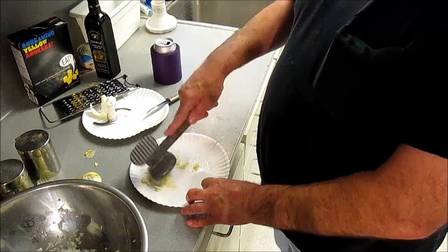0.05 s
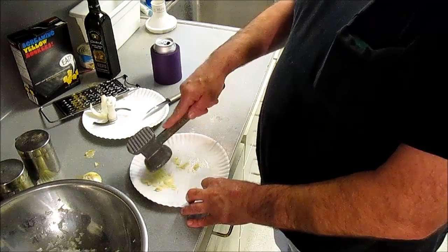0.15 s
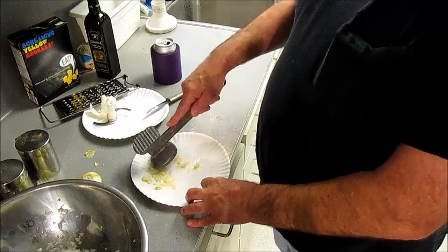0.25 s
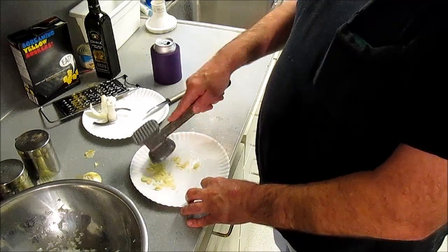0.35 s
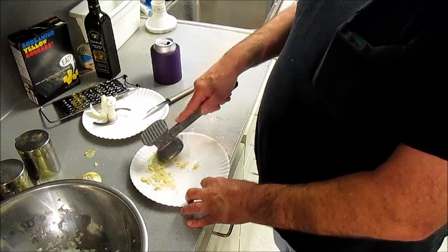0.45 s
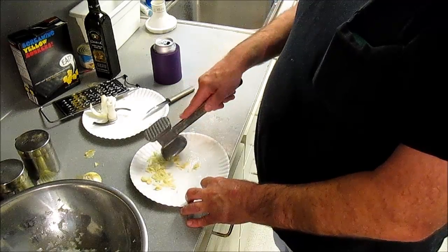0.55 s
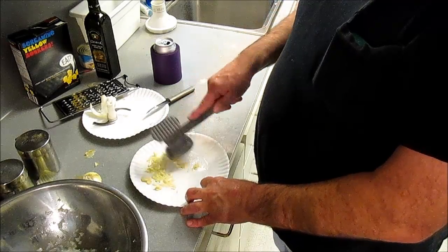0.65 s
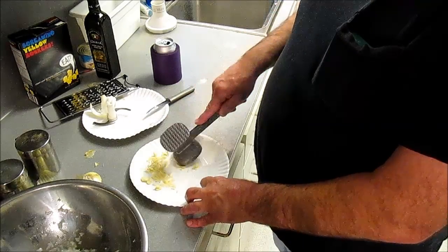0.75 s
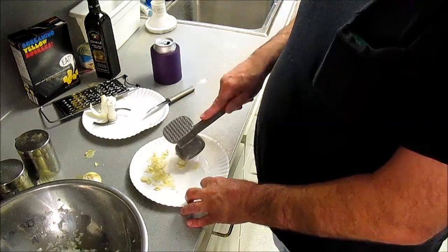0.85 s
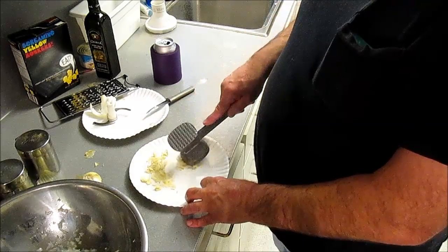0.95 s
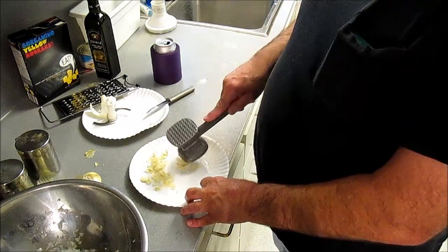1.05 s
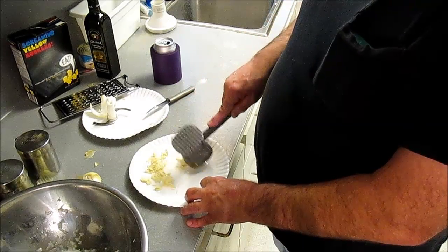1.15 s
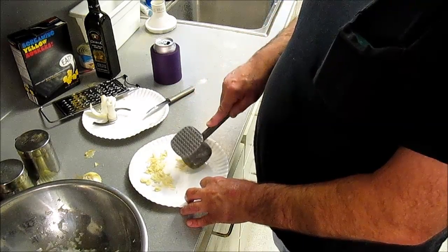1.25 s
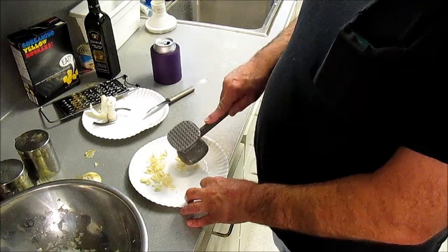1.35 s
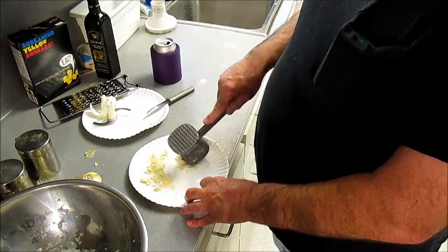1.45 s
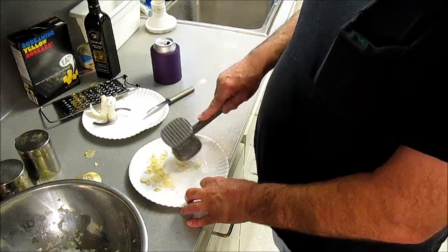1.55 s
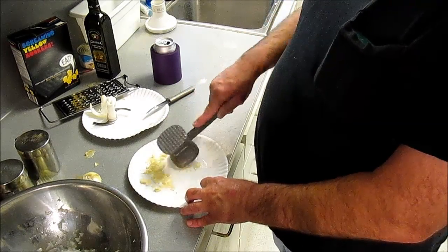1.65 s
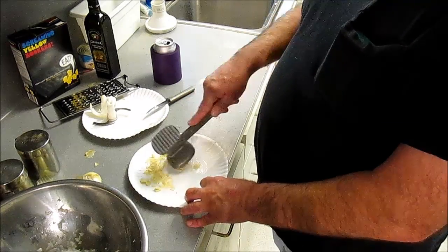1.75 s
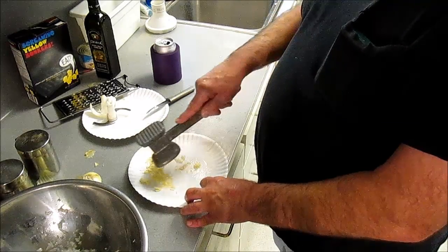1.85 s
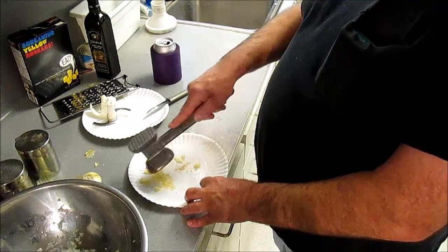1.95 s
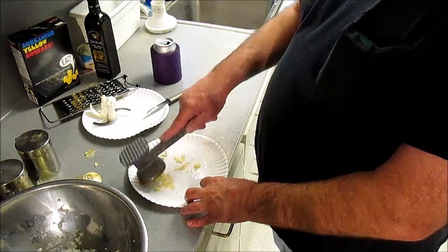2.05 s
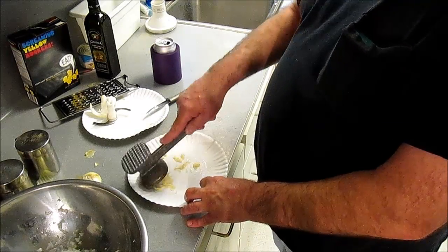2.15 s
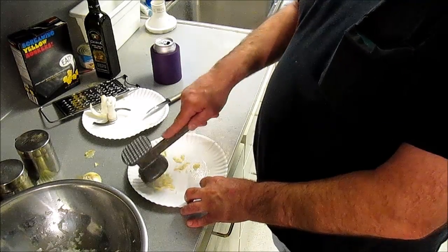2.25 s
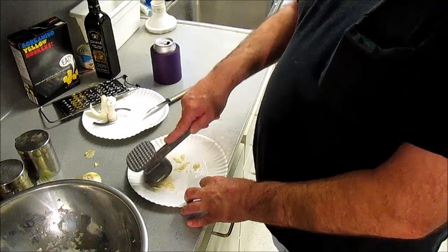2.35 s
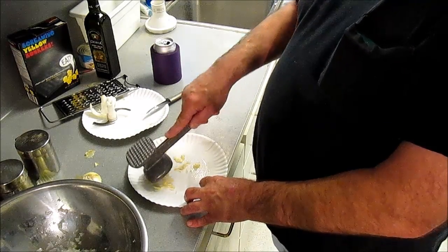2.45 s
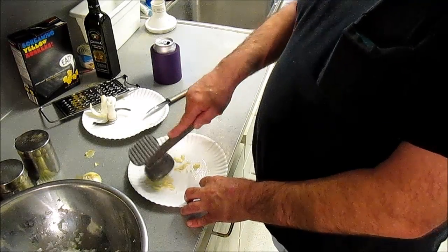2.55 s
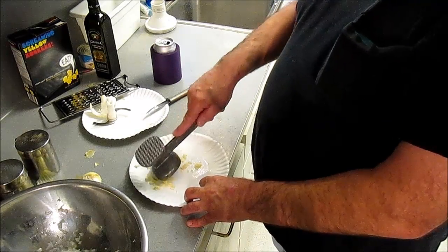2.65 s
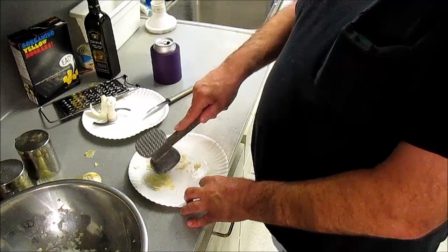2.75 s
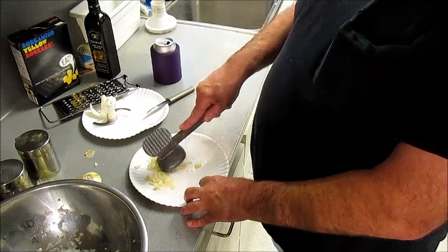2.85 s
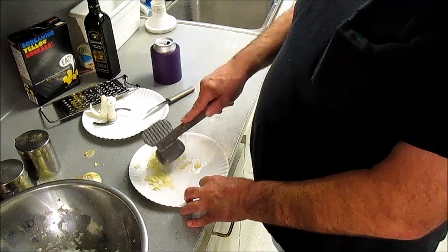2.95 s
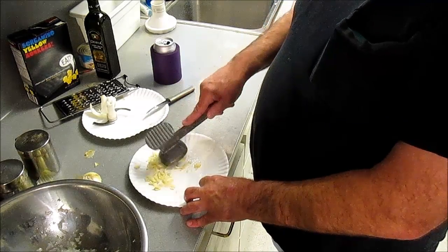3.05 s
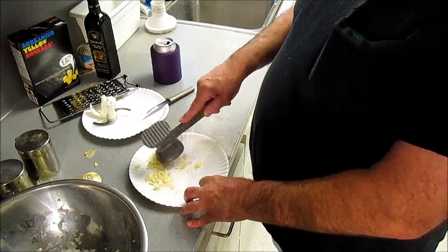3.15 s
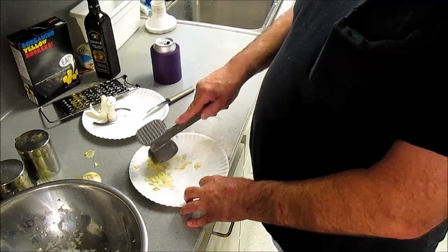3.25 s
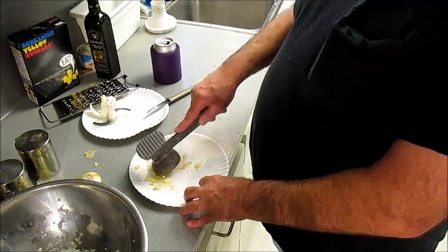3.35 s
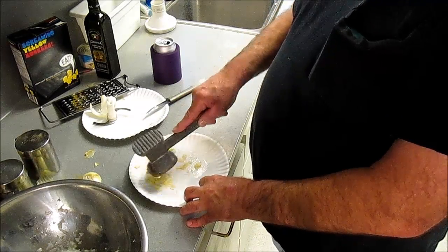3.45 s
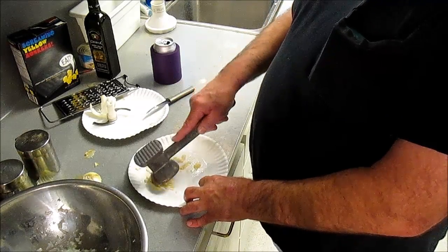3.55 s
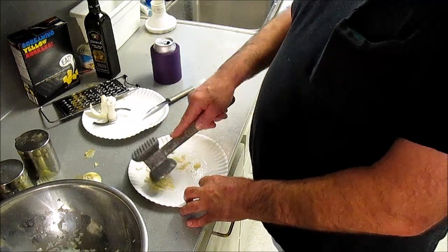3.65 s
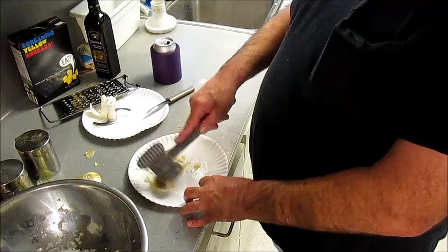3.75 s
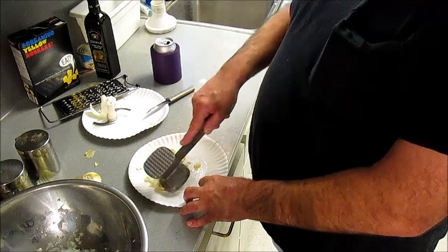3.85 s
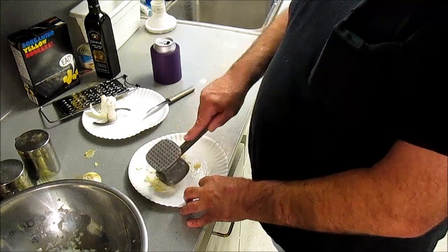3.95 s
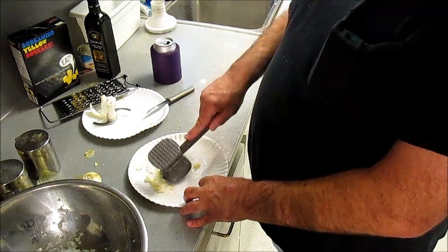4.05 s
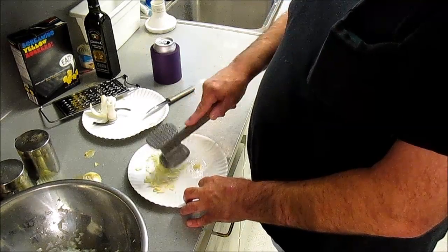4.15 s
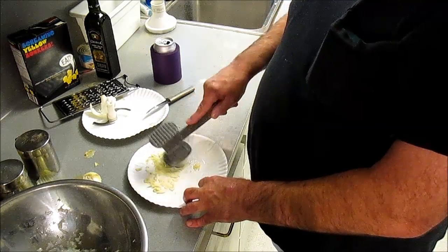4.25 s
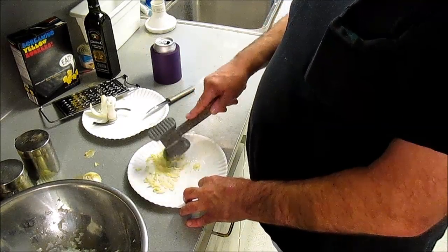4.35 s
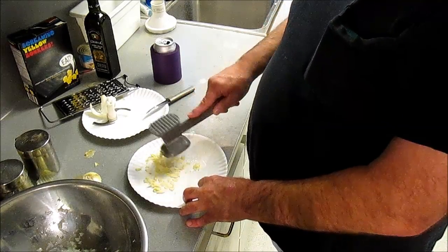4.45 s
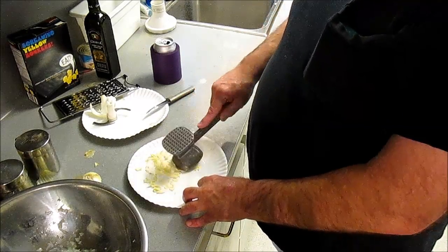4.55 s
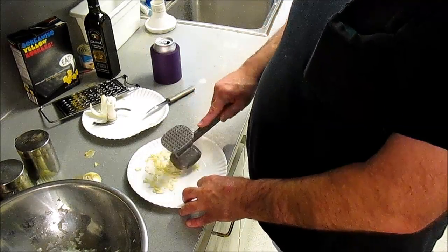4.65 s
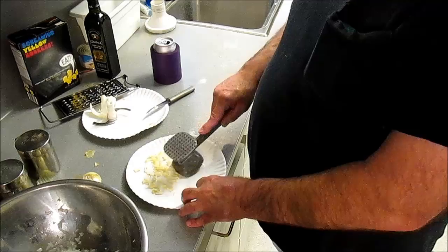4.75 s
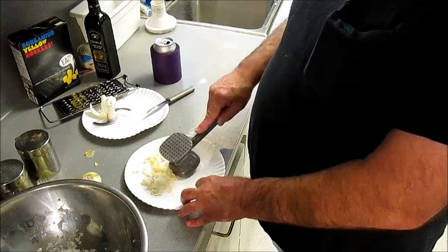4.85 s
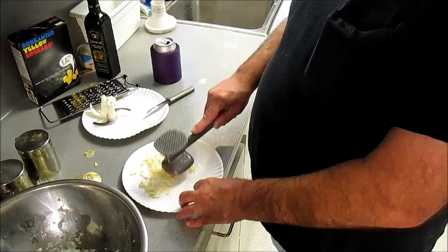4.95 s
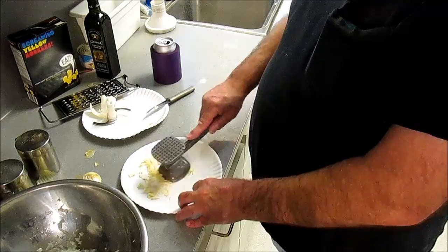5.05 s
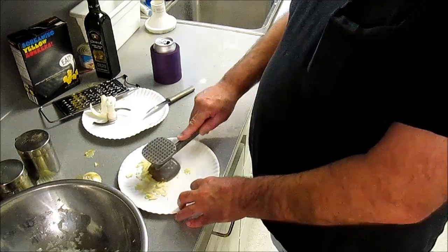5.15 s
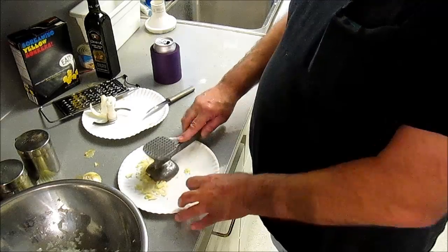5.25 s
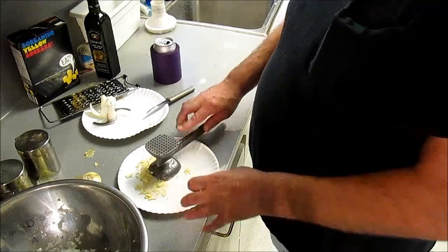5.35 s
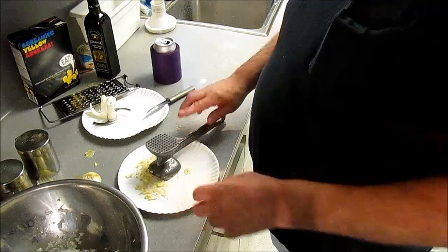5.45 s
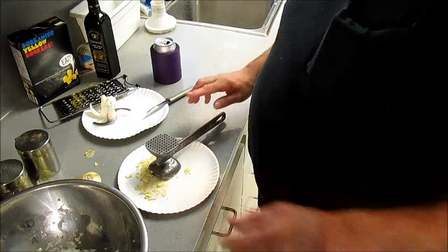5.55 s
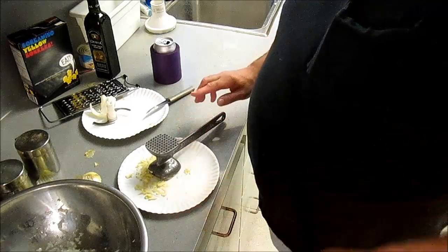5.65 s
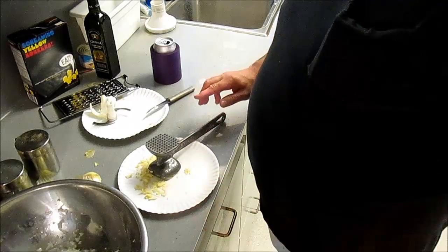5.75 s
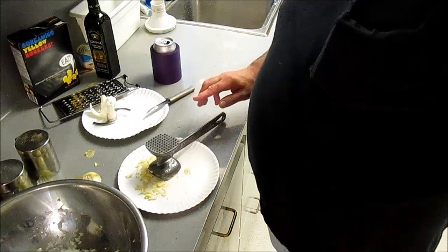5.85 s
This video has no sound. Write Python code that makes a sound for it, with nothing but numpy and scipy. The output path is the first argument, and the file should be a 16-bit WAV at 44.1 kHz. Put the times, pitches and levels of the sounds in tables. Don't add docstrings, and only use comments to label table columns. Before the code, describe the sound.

Close in a small hard-walled kitchen, a metal mallet pounds garlic on a paper plate about four times a second. Each blow is a hollow counter thump with papery clatter and a small wet crunch; nearby metal utensils jingle faintly. After five seconds it scuffs, clacks down and rings brightly until the handle lands. A low fridge drone sits underneath. Two close microphones.

```python
import sys
import numpy as np
from scipy import signal
from scipy.fft import rfft, irfft, next_fast_len
from scipy.io import wavfile
from scipy.ndimage import uniform_filter1d

SR = 44100
rng = np.random.default_rng(int(sys.argv[2]) if len(sys.argv) > 2 else 0)


def volts_from_decibels(level):
    exponent = np.asarray(level, float) / 20
    return 10 ** exponent


def file_out(sig):
    cols = np.atleast_2d(sig).T
    lim = np.clip(cols, -1, 1)
    pcm = np.round(lim * 32767).astype(np.int16)
    wavfile.write(sys.argv[1], SR, pcm)


N = 259772
LEAD = 4096
SIZE = next_fast_len(N + LEAD + SR // 2, real=True)
HZ = np.arange(SIZE // 2 + 1) * SR / SIZE
STEREO = np.array([[1], [-1]])


def read(table, hz, column=1):
    table = np.array(table, float)
    return np.interp(np.log(np.maximum(hz, 1)), np.log(table[:, 0]), table[:, column])


def colour(x, table):
    gain = volts_from_decibels(read(table, np.fft.rfftfreq(x.shape[-1], 1 / SR)))
    y = irfft(rfft(x) * gain, x.shape[-1])
    return y * np.std(x) / np.std(y)


def fade(t, t60):
    return (t >= 0) * np.exp(-np.log(1000) * np.maximum(t, 0) / t60)


def ring(modes, t):
    hz, db, t60 = np.array(modes, float)[:, :3].T[:, :, None]
    return volts_from_decibels(db) * fade(t, t60) * np.sin(2 * np.pi * hz * t)


def add(track, s, sound):
    i = LEAD + int(round(s * SR))
    track[..., i:i + sound.shape[-1]] += sound[..., :track.shape[-1] - i]


def pair(count):
    # (frequency [Hz], correlation [0..1])
    likeness = [(60, 0.99), (290, 0.89), (640, 0.82), (1400, 0.59), (3100, 0.042), (16000, 0.0088)]
    c = np.clip(read(likeness, np.fft.rfftfreq(count, 1 / SR)), 0, 1)
    mid, side = rfft(rng.standard_normal((2, count)))
    return (np.sqrt(1 + c) * mid + np.sqrt(1 - c) * side * STEREO) / np.sqrt(2)


def grit(count, spread_db):
    grains = np.repeat(rng.exponential(size=count // 32 + 1), 32)[:count]
    lumps = uniform_filter1d(grains, size=24)
    noise = 0.9 * rng.standard_normal(count) + rng.standard_normal((2, count))
    x = noise * volts_from_decibels(spread_db * np.minimum(lumps, 3))
    return x / np.std(x)


def background():
    # (frequency [Hz], density [dB per Hz])
    air_tone = [(25, -25), (40, 3), (60, 4.5), (150, 1.5), (300, 1), (600, -6), (1000, -10.5), (1700, -16),
                (2000, -21.5), (3000, -26.5), (6000, -26.5), (9000, -38.5), (13000, -44), (16400, -48)]
    # (time [s], level [dB])
    air_swell = [
        (0, -52.5),
        (2, -54),
        (5.3, -54),
        (5.6, -52.5),
        (5.75, -51),
        (5.89, -50.5),
    ]
    fridge_hz, fridge_width_hz, fridge_db = 115.1, 7.4, -56
    t = (np.arange(SIZE) - LEAD) / SR
    air = irfft(pair(SIZE) * volts_from_decibels(read(air_tone, HZ)), SIZE)
    air = air / np.std(air) * volts_from_decibels(np.interp(t, *np.transpose(air_swell)))
    hum_band = 1 / (1 + ((HZ - fridge_hz) / fridge_width_hz) ** 4)
    drone = irfft(rfft(rng.standard_normal(SIZE)) * hum_band, SIZE)
    return air + volts_from_decibels(fridge_db) * drone / np.std(drone)


def plate_clatter(t):
    # (frequency [Hz], level [dB])
    plate = [(150, -41), (250, -7), (500, 3), (900, 0), (1400, -5), (2200, -12.5), (3500, -14)]
    # (frequency [Hz], level [dB])
    knock = [(700, -15), (1100, 4.5), (1500, -5.5), (2000, 0), (2800, -14)]
    rattle = irfft(pair(len(t)))
    clatter = colour(rattle, plate) * fade(t, 0.13) * (1 - fade(t, 0.031))
    smack = colour(rattle.mean(axis=0), knock) * fade(t, 0.026) * (1 - fade(t, 0.0042))
    return clatter + volts_from_decibels(-1) * smack


def garlic_crunch(t, crunch_db):
    # (frequency [Hz], level [dB])
    crushing = [(900, -1.5), (1500, 2.5), (2200, -2), (3000, -3), (5000, -9.5), (7500, -14), (10000, -22.5),
                (13000, -21.5), (16000, -23)]
    burst = 0.29 * fade(t, 0.0077)
    burst = burst + 1.5 * fade(t - .0022, 0.0015)
    burst = burst + fade(t - .002, 0.015)
    burst = burst + volts_from_decibels(-6.5) * fade(t - .004, 0.21)
    return volts_from_decibels(crunch_db + 10.5) * colour(grit(len(t), spread_db=5.0), crushing) * burst


def utensils(out, t):
    # (frequency [Hz], level [dB])
    bowl = [(4955, 0)]
    grater = [(13030, 0), (5949, -6)]
    knife = [(13760, 0), (14150, -3), (10300, -5)]
    # (time [s], level [dB])
    bowl_shaken = [
        (0.7186, -53.5),
        (0.954, -60),
        (1.6716, -59),
        (2.1163, -59.5),
        (2.3579, -58),
        (3.5749, -56),
        (4.0637, -56),
    ]
    grater_shaken = [
        (0.7186, -61),
        (1.6716, -58),
        (2.1163, -67),
        (2.3579, -68),
        (2.6038, -67),
        (3.0946, -69),
        (3.5749, -61),
        (3.8214, -59),
    ]
    knife_shaken = [
        (0.954, -68),
        (2.8505, -60),
        (3.3405, -65),
        (4.3023, -61),
        (4.5494, -59),
        (4.7989, -64),
        (5.041, -67),
    ]
    late_s, t60_s, reference_hz = .006, .3, 5000
    for tones, shaken in ((bowl, bowl_shaken), (grater, grater_shaken), (knife, knife_shaken)):
        modes = [(hz, db, t60_s * np.sqrt(reference_hz / hz)) for hz, db in tones]
        jingle = ring(modes, t).sum(axis=0)
        for s, db in shaken:
            add(out, s + late_s, volts_from_decibels(db) * jingle)


def pounding():
    # (time [s], level [dB], contact time [ms], crunch level [dB])
    blows = [(-0.04, -8, 0.27, -41), (0.207, -11.5, 0.18, -46), (0.4652, -10.0, 0.29, -45),
             (0.719, -9.5, 0.2, -39.5), (0.9543, -12.5, 0.24, -43.5), (1.1901, -12.5, 0.12, -42.5),
             (1.4258, -13.5, 0.12, -45), (1.672, -12, 0.12, -43.5), (2.1165, -11.5, 0.17, -45.5),
             (2.3583, -12, 0.17, -46), (2.604, -12.5, 0.13, -43.5), (2.8511, -13.5, 0.17, -46),
             (3.0948, -11.5, 0.24, -44.5), (3.3404, -22.5, 0.23, -56), (3.575, -11.5, 0.15, -43),
             (3.8216, -13, 0.13, -45), (4.064, -14, 0.13, -44.5), (4.3028, -12, 0.23, -44),
             (4.55, -14, 0.25, -45), (4.799, -14.5, 0.28, -46.5), (5.0413, -13, 0.11, -45)]
    # (frequency [Hz], level [dB], t60 [s], sign of the mode shape under the plate)
    counter = [(49.7, -29, 0.15, 1), (87.3, -28.5, 0.29, -1), (111.9, -12, 0.18, -1),
               (120.3, -11.5, 0.15, -1), (164.6, -17.5, 0.16, 1), (230.7, 0.5, 0.036, 1),
               (258.2, -0.35, 0.047, -1), (312.6, -15, 0.1, -1), (351.4, -20, 0.37, -1),
               (381.2, -9.5, 0.12, -1), (413, -26, 0.49, -1), (484.3, 0.57, 0.044, 1), (562, -26.5, 0.5, 1),
               (605, -4.5, 0.058, 1), (688, -23, 0.29, 1), (701, -3.5, 0.024, -1), (848, -3, 0.017, 1),
               (915, -7, 0.047, 1), (992, -31, 0.4, 1), (1093.5, -2.5, 0.051, 1), (1085, -12, 0.026, -1),
               (1805, -16, 0.032, -1)]
    # (frequency [Hz], level [dB], t60 [s])
    cupboard = [(210, -21, 0.25), (290.9, -21.5, 0.33), (59, -35, 0.19)]
    usual_blow_db, usual_bass_db, bass_squeeze = -11.5, 0.2, 0.38
    out, spread = np.zeros((2, SIZE)), np.zeros((2, SIZE))
    t = np.arange(16384) / SR
    short = t[:8192]
    hollow = ring(cupboard, t).sum(axis=0) * (1 - fade(t, 0.12))
    hz = np.array(counter)[:, 0]
    sign = np.sign(np.array(counter)[:, 3])
    lean_db = np.where((hz < 200) | (hz > 800), .4, 1.6)
    place = volts_from_decibels(STEREO * lean_db * rng.standard_normal(len(hz)))
    modes = ring(counter, t) * np.where(hz[:, None] > 330, fade(t, 0.75), 1)
    for s, db, contact_ms, crunch_db in blows:
        bass_db = usual_bass_db - bass_squeeze * (db - usual_blow_db)
        gain = sign * volts_from_decibels((hz < 200) * bass_db + 0.68 * rng.standard_normal(len(hz)))
        body = (gain * place) @ modes + hollow
        clatter = plate_clatter(short)
        pole = np.exp(-1000 / (max(contact_ms, .03) * SR))
        push = [(1 - pole) ** 2], [1, -2 * pole, pole ** 2]
        body = volts_from_decibels(db) * signal.lfilter(*push, body)
        clatter = volts_from_decibels(db) * signal.lfilter(*push, clatter)
        add(out, s, body)
        add(out, s, volts_from_decibels(-1) * clatter)
        add(spread, s, volts_from_decibels(-5.5) * body)
        add(spread, s, clatter)
        crunch = garlic_crunch(short, crunch_db)
        add(out, s - .0022, crunch)
        add(spread, s - .0022, crunch)
    utensils(out, short)
    return out, spread


def kitchen(dry):
    # (frequency [Hz], echo level [dB], t60 [s])
    walls = [(51.4, 9, 0.23), (116, -51, 0.16), (213, -0.5, 0.33), (292, -7.5, 0.39), (417, -7.5, 0.39),
             (640, -6, 0.46), (1060, -8, 0.4), (1520, -8, 0.51), (2520, -9.5, 0.55), (4100, -12.5, 0.47),
             (7800, -11, 0.44), (15100, -27, 0.165)]
    t = np.arange(32768) / SR
    noise = pair(len(t))
    centres = np.array(walls)[:, 0]
    echo = 0
    for (hz, db, t60), peak in zip(walls, np.eye(len(walls))):
        band = read(np.c_[centres, peak], np.fft.rfftfreq(len(t), 1 / SR))
        shape = fade(t, t60) * (1 - fade(t, 0.094))
        echo = echo + volts_from_decibels(db) * irfft(noise * band) * shape / np.sqrt(np.sum(shape ** 2))
    return irfft(rfft(dry.mean(axis=0)) * rfft(echo, SIZE), SIZE)


def mallet_laid_down():
    # (time [s], level [dB], length [s])
    scuffs = [
        (3.336, -48, 0.0035),
        (5.174, -68, 0.036),
        (5.255, -59, 0.0083),
        (5.285, -57.5, 0.03),
        (5.84, -77, 0.034),
    ]
    # (frequency [Hz], level [dB])
    paper = [(1000, -27), (2500, 4), (4000, 2), (6000, 6), (8000, -5), (13000, -15), (16000, -21)]
    # (frequency [Hz], level [dB])
    clack_tone = [(150, -30), (400, 4), (900, 0), (1900, -2.5), (2800, -12), (5000, -16.5), (8000, -23.5),
                  (10000, -35), (16000, -30)]
    # (frequency [Hz], level [dB], t60 [s])
    head = [(1082, -12, .8), (1152, -15, .6), (1868, -14, .15), (3241, 0, 1.4), (5130, -17, .14),
            (5400, -25, .3), (6724, -27, .45), (7187, -23, .45), (7741, -25, .4), (8166, -19, .3),
            (10500, -40, .3), (11600, -33, .19), (12270, -34, .29), (13870, -35, .19), (14650, -36, .22)]
    # (frequency [Hz], level [dB], t60 [s])
    handle = [(7192, -14, .4), (12290, -15, .7), (5739, -22, .2)]
    drop_s, ring_db, clack_db = 5.3114, -33.5, -22.5
    rest_s, rest_db, damped_t60_s = 5.508, -56, .9
    out, t = np.zeros((2, SIZE)), np.arange(32768) / SR
    since_rest = t - rest_s + drop_s
    held = np.where(t > rest_s - drop_s, volts_from_decibels(-3.5) * fade(since_rest, damped_t60_s), 1)
    clack_shape = (fade(t, 0.05) + volts_from_decibels(-16.5) * fade(t, 0.41)) * (1 - fade(t, 0.00097))
    clack = colour(irfft(pair(len(t))), clack_tone) * clack_shape
    lean = volts_from_decibels(STEREO * -1.2)
    ringing = lean * ring(head, t).sum(axis=0) * held
    add(out, drop_s, volts_from_decibels(ring_db) * ringing + volts_from_decibels(clack_db) * clack)
    add(out, rest_s, volts_from_decibels(rest_db) * (ring(handle, t).sum(axis=0) + volts_from_decibels(13) * clack))
    short = t[:4096]
    for s, db, length in scuffs:
        rubbing = np.minimum(fade(short - length, 0.076) + (short < length), 1)
        add(out, s, volts_from_decibels(db) * colour(grit(len(short), spread_db=5.5), paper) * rubbing)
    return out


def scene():
    blows, spread = pounding()
    mallet = mallet_laid_down()
    mix = blows + mallet + kitchen(spread + mallet) + background()
    return mix[:, LEAD:LEAD + N]


def low_pass(x):
    return signal.sosfilt(signal.butter(12, 16510, fs=SR, output="sos"), x)


def record(dry):
    # (frequency [Hz], level [dB])
    microphone = [(22, -25), (33, -8), (48, -0.5), (15000, 0), (15800, -9), (16500, -34), (22000, -60)]
    # (frequency [Hz], left minus right [dB])
    tilt = [(60, -4), (110, 1), (200, 0.5), (380, -1.5), (700, 0), (1290, -0.5), (2380, -2), (4400, -0.5),
            (8120, -1.5), (15000, -0.5)]
    response = volts_from_decibels(read(microphone, HZ) + STEREO * read(tilt, HZ) / 2)
    earlier_left = np.exp(1j * np.pi * STEREO * HZ / SR)
    mix = irfft(rfft(dry, SIZE) * response * earlier_left, SIZE)[:, :N]
    return low_pass(mix)


dry = scene()
out = record(dry)
file_out(out)
```